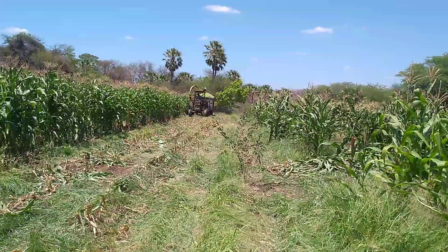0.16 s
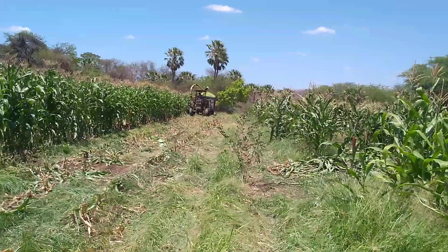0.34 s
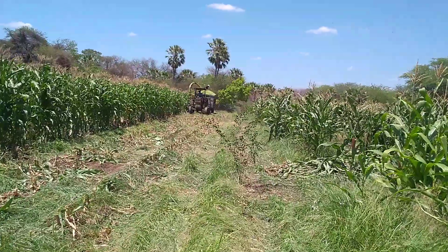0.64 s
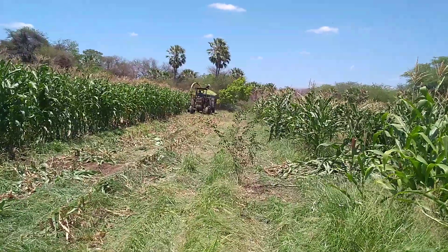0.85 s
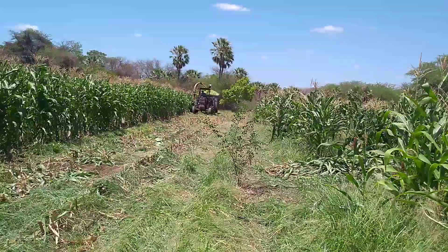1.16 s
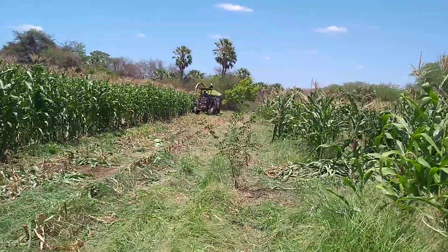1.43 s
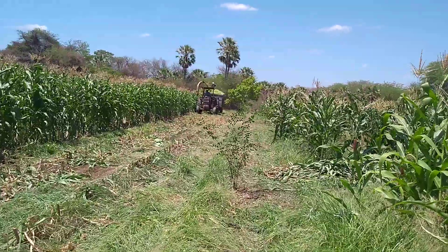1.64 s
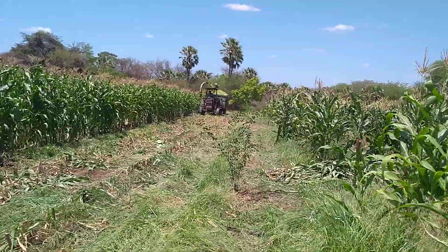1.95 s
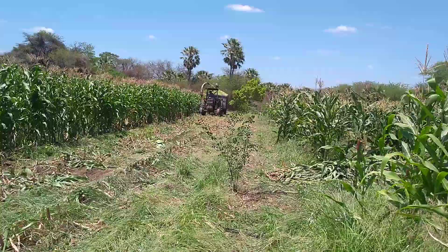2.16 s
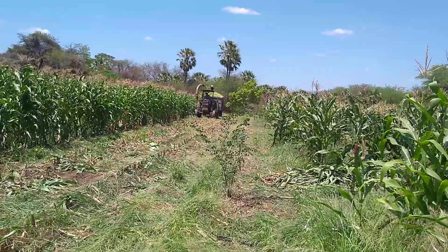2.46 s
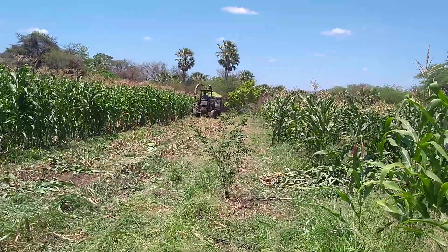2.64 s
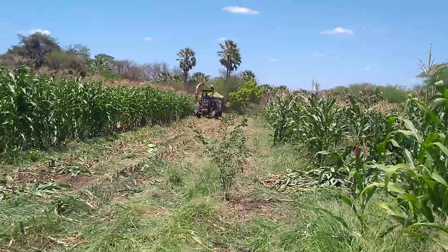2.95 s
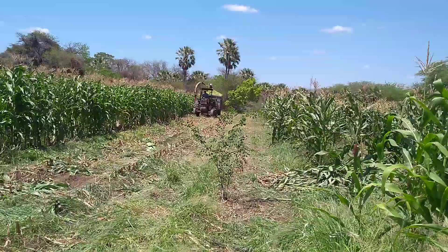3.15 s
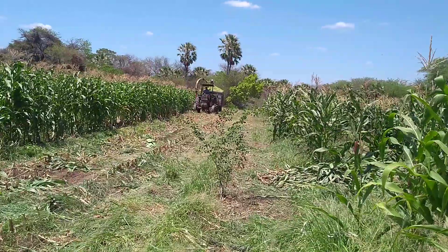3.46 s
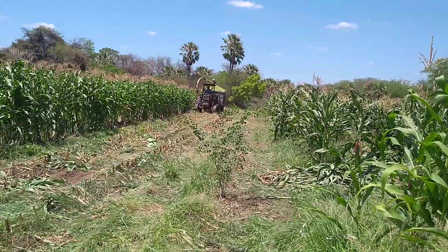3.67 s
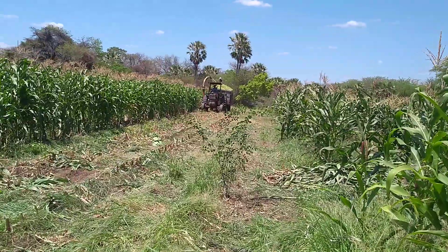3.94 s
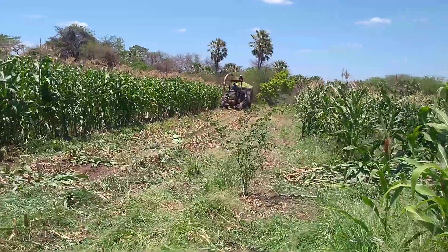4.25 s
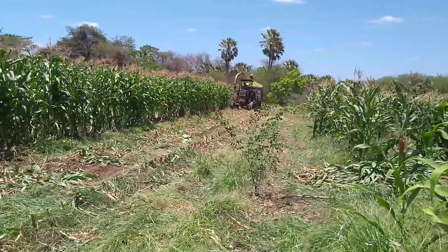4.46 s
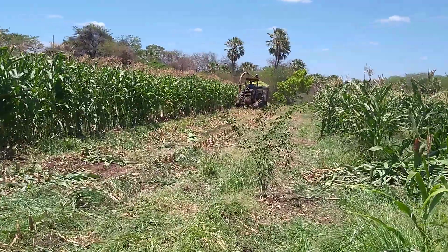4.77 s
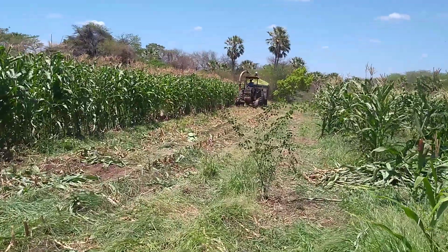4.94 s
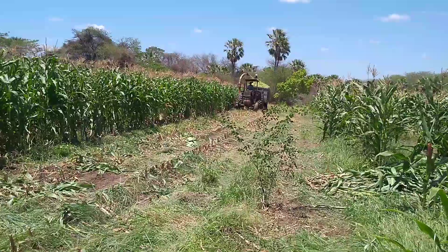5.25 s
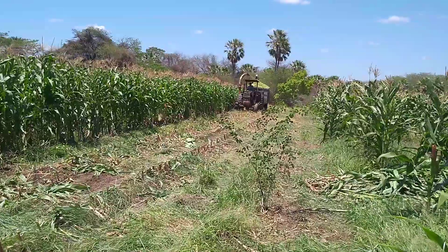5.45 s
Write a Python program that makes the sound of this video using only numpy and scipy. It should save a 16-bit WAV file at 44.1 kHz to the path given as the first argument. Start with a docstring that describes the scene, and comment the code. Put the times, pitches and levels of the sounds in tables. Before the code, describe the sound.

A diesel tractor works straight ahead in an open field, its exhaust throbbing and barking throughout. It pulls a forage harvester whose cutter adds a drone and a fluttering whine, while chopped corn hisses up the spout. At the very start a quick cluster of dull knocks hits the microphone, and the machine sound dips briefly. Light wind buffets the microphone with low puffs during the first second or so. The tractor grows louder until about 3 seconds, with occasional harder exhaust barks. Another small knock comes at about 2.5 seconds. Around 3 seconds the rumble swells for a moment as the cutter takes a thick load. From about 2 seconds on, stalks make faint rattles and clinks against the metal spout. The engine then holds its level, rising slightly in pitch until the end at about 5.6 seconds.

```python
"""A throbbing, barking exhaust: a four-cylinder diesel tractor slowly nears across an open field.
Each firing puffs gas and rings the pipe. It pulls a forage harvester: the cutter drum, geared to the
engine, drones and whines; chopped crop hisses, rattles and clinks up the spout. Ground bounce notches
the noise. Early on, light wind buffets the microphone; a few small knocks reach it."""
import sys
import numpy as np
from scipy import signal
from scipy.fft import rfft, irfft
from scipy.io import wavfile
from scipy.ndimage import uniform_filter1d

SR = 44100
rng = np.random.default_rng(int(sys.argv[2]) if len(sys.argv) > 2 else 0)


def wav_out(sig):
    """Save sig, one row per channel (or a flat mono array), as 16-bit PCM at SR to the path in sys.argv[1]."""
    wavfile.write(sys.argv[1], SR, np.round(np.clip(np.atleast_2d(sig).T, -1, 1) * 32767).astype(np.int16))


N = 246959
TIME_S, BINS_HZ = np.arange(N) / SR, np.fft.rfftfreq(N, 1 / SR)

# engine speed: t/s, firing rate/Hz
FIRING_HZ = [(0, 64.82), (.8, 64.13), (1.3, 66.01), (1.7, 65.53), (2, 64.74), (2.4, 65.46), (2.9, 65.93),
             (3.4, 66.4), (4, 66.43), (4.5, 67.61), (5, 68.63), (5.6, 69.55)]
# cylinder strengths in firing order: level/dB
CYLINDER_DB = [1, -1.3, -1.8, 2.8]
# loudness; the level dips briefly after the opening knock, then grows as the tractor nears: t/s, level/dB
LOUDNESS_DB = [(0.0, -2.5), (0.17, -12), (0.58, -6), (0.75, -6), (0.95, -7), (1.55, -3), (1.98, -2),
               (2.12, -3.5), (2.4, -1), (2.8, -0.7), (2.98, -0.1), (3.15, -1.1), (4.3, -1.06), (5.6, -1)]
# exhaust lines, quarter steps from unequal cylinders: multiple of firing rate, level/dB
EXHAUST_LINES = [(1.75, -8), (2, -1), (2.25, -6), (2.5, -10), (2.75, -25), (3, -4), (3.25, -16.5),
                 (3.75, -10), (4.25, -14), (4.75, -19), (5, -13.5), (5.75, -22), (6, -26)]
# exhaust spectra: f/Hz, level/dB
RUMBLE_DB = [(20, -45), (50, -23), (88, -12), (115, -13), (150, 2), (200, -1.5), (250, 1), (330, -7),
             (440, -8), (600, -14.5), (1000, -37), (2500, -74)]
BARK_DB = [(100, -21), (300, 1.5), (480, 6.5), (650, 5), (800, 5.5), (1050, -4.5), (1350, -2.5),
           (1550, -24), (1900, -16), (2400, -27), (3300, -28), (4300, -19), (7000, -102)]
PIPE_DB = [(300, -40), (650, 6), (850, -1.5), (1300, -5), (1550, -28), (3000, -70)]
# extra-hard firings: t/s, boost/dB
HARD_BARKS = [(0.728, 9), (0.79, 7), (1.07, 6), (2.058, 4), (2.136, 5), (2.259, 2), (2.503, 2.5),
              (3.292, 3), (3.653, 4), (3.713, 1.5), (4.013, 3), (4.55, 4.5), (4.61, 4), (4.759, 3),
              (5.078, 4), (5.255, 3), (5.497, 4.5)]
# ground bounce, moving with the tractor: t/s, first dip/Hz, upper mids/dB, crest/dB
GROUND_BOUNCE = [(0, 636, -2.5, -1.5), (1, 677, -1.5, -1.5), (2, 568, -0.5, 2.5), (2.75, 642, 1.5, 3.5),
                 (3.15, 590, 2, 7), (3.55, 502, 2, 5.5), (4.4, 497, -4.5, 4.5), (5, 560, 0.5, 5),
                 (5.6, 543, 0, 5.5)]
# knife whine: multiple of knife rate, level/dB
WHINE_LINES = [(3, 2.5), (5, -11), (6, -8.5), (7, -5.5)]
# crop spray spectrum: f/Hz, level/dB
SPRAY_DB = [(200, -15), (900, 13.5), (1350, 13.5), (1800, 10.5), (2600, 2.5), (3400, -2.5), (4300, -5.5),
            (5700, -6.5), (7800, -9), (10000, -12), (12500, -13.5), (14500, -15)]
# spout resonances: t/s, lower ring/Hz, lower level/dB, upper level/dB
SPOUT_RINGS = [(0, 3030, -78, -71), (.6, 3150, -82, -75), (1.1, 3050, -74, -73), (1.7, 3270, -68, -72),
               (2.3, 3080, -73, -75), (2.65, 2930, -64, -70), (3.05, 2710, -67, -63),
               (3.25, 3280, -65, -71), (3.9, 3160, -65, -75), (4.25, 3080, -71, -74), (4.7, 3140, -67, -78),
               (4.9, 2920, -77, -63), (5.6, 2750, -73, -74)]
# diffuse treble spectrum: f/Hz, level/dB
TREBLE_DB = [(100, -39), (2000, -45), (2900, -45), (3500, -7), (4500, 10), (6000, 7.5), (8000, 7.5),
             (11000, 1.5), (14000, -3)]
# wind spectrum: f/Hz, level/dB
WIND_DB = [(15, -18), (40, -14), (70, -10), (110, -8), (160, -12.5), (240, -15), (350, -23.5), (600, -59),
           (2000, -80)]
# wind buffets: t/s, level/dB, half length/s
BUFFETS = [(0.175, -31, 0.007), (0.337, -37, 0.028), (.7, -28.5, 0.027), (0.839, -31, 0.007),
           (1.069, -35, 0.015)]
# knocks at the microphone: t/s, level/dB, f/Hz, low-pass/Hz, relative tip level/dB
MIC_KNOCKS = [(.0585, -19, 300, 600, -35), (.0613, -18, 420, 900, -21), (.0675, -15, 130, 350, -45),
              (.0694, -9, 320, 520, -27), (2.409, -29, 900, 2500, -7), (2.4607, -12, 350, 1100, -8)]
# hard stalks hitting the spout: t/s, level/dB, f/Hz
STALK_HITS = [(1.94, -53, 3200), (2.668, -51, 2960), (2.944, -51, 3590), (2.973, -50, 3540),
              (2.98, -52, 2830), (3.045, -53, 2660), (3.652, -54, 3300), (3.828, -50, 3170),
              (4.181, -54, 3020), (4.433, -53, 3150), (4.724, -48, 3130), (5.25, -53, 3470),
              (5.468, -54, 2790), (5.524, -52, 2780)]
# microphone ports, left minus right: f/Hz, level/dB
PORT_BALANCE_DB = [(30, -4.5), (65, -4), (110, -1.2), (200, .1), (370, .5), (680, .4), (1100, 0)]
# microphone ports, out-of-phase part: f/Hz, level/dB
PORT_QUADRATURE_DB = [(30, -4.5), (65, -5.5), (130, -9.2), (250, -15), (450, -19), (750, -29), (1200, -46)]


def amp(db):
    """dB to amplitude."""
    return 10 ** (np.asarray(db) / 20)


def unit_rms(x):
    """Scale to rms 1."""
    return x / np.sqrt(np.mean(x ** 2) + 1e-20)


def curves(rows, t=TIME_S):
    """Table columns, interpolated in time."""
    s, *columns = np.transpose(rows)
    return [np.interp(t, s, c) for c in columns]


def spectrum_db(points, hz=BINS_HZ):
    """Spectrum interpolated in log frequency."""
    f, db = np.transpose(points)
    return np.interp(np.log(hz + 1), np.log(f + 1), db)


def bell(x, width):
    """Gaussian: 1 at zero, 1/e at width."""
    return np.exp(-(x / width) ** 2)


def noise(spectrum):
    """Coloured noise, rms 1."""
    return unit_rms(irfft(rfft(rng.standard_normal(N)) * amp(spectrum_db(spectrum)), N))


def drift(top_hz):
    """Random wander up to top_hz, rms 1."""
    t = np.linspace(0, TIME_S[-1], 1200)
    slow = sum(np.sin(2 * np.pi * (hz * t + rng.random())) for hz in top_hz * np.geomspace(.1, 1, 16))
    return np.interp(TIME_S, t, unit_rms(slow))


def tone(cycles):
    """Cosine, rms 1."""
    return np.sqrt(2) * np.cos(2 * np.pi * cycles)


def partials(cycles, table, waver_cycles, waver_db=1):
    """Lines of a rotation, wavering in level and phase."""
    return sum(amp(db + waver_db * drift(5)) * tone(k * cycles + rng.random() + waver_cycles * drift(5))
               for k, db in table)


def layer_gain(db, follow, db_per_s):
    """A share of the machine's loudness curve plus a slow ramp."""
    return amp(db + follow * curves(LOUDNESS_DB)[0] + db_per_s * (TIME_S - 3))


def close_echo(hz, comb_hz=2250, fade_hz=4800):
    """Comb gain of a short echo at the microphone; long waves bend round the small reflector."""
    comb = abs(1 - np.exp(-2j * np.pi * hz / comb_hz) / (1 + (hz / fade_hz) ** 2))
    return 1 + (comb - 1) * np.minimum(2 * hz / comb_hz, 1)


def across_field(x, spectrum, fading_db, dip_db=8):
    """Source colour, ground-bounce dips, fading in moving air, close echo; rms 1."""
    hz, t, z = signal.stft(x, SR, nperseg=2048, noverlap=1536)
    hz = hz[:, None] + 1
    first_hz, mids_db, crest_db = curves(GROUND_BOUNCE, t)
    second_hz = 2.5 * first_hz
    third_hz = 2 * second_hz - first_hz
    dips = bell(np.log(hz / first_hz), .17) + bell(hz - second_hz, 130) + .5 * bell(hz - third_hz, 130)
    crest = bell(np.log(hz / (1.42 * first_hz)), .36)
    mids = bell(np.log(hz / 1800), .34)
    ground_db = crest_db * crest + mids_db * mids - dip_db * dips
    patches = uniform_filter1d(rng.standard_normal(z.shape), 16, axis=0)
    patches = unit_rms(uniform_filter1d(patches, 14, axis=1))
    z = z * close_echo(hz) * amp(spectrum_db(spectrum, hz) + ground_db + fading_db * patches)
    return unit_rms(signal.istft(z, SR, nperseg=2048, noverlap=1536)[1][:N])


def blowdown(firings, rise_cycles, floor, uneven_db):
    """Gas flow per firing: quick rise, slower fall, strength by cylinder."""
    count = firings.astype(int)
    strength = amp(np.take(CYLINDER_DB, count % 4) + uneven_db * rng.standard_normal(512)[count])
    age = (firings % 1) / rise_cycles
    return floor + strength * age * np.exp(1 - age)


def exhaust(firings):
    """Firing note, overtones and gas puffs that rumble, bark and ring the pipe."""
    note = layer_gain(db=-34.5, follow=1, db_per_s=-.33) * amp(.25 * drift(7.3)) * tone(firings - .13)
    overtones = partials(firings, EXHAUST_LINES, waver_cycles=.052)
    overtones *= layer_gain(db=-36, follow=1, db_per_s=-.8)
    puffs = blowdown(firings, rise_cycles=.13, floor=1, uneven_db=-3.5) * rng.standard_normal(N)
    rumble = across_field(puffs, RUMBLE_DB, fading_db=-.9)
    rumble *= layer_gain(db=-37.5, follow=.52, db_per_s=1.46) * crop_wad(db=6.5)
    hard = amp(sum(db * bell(TIME_S - s, .0047) for s, db in HARD_BARKS))
    bark = layer_gain(db=-44, follow=1.05, db_per_s=-.5) * gas_bark(firings)
    ring = layer_gain(db=-43.8, follow=1.2, db_per_s=.4) * pipe_ring(firings)
    return note + overtones + rumble + hard * (bark + ring)


def gas_bark(firings):
    """Pulsed gas noise: part repeats each engine cycle, part is fresh turbulence."""
    cycle = rng.standard_normal(2600)
    repeating = cycle[(firings / 4 % 1 * len(cycle)).astype(int)]
    flow = blowdown(firings, rise_cycles=.14, floor=.14, uneven_db=.6)
    gas = flow * (.9 * repeating + rng.standard_normal(N))
    bark = across_field(gas, BARK_DB, fading_db=2.96)
    # even barks: each firing's energy follows its flow
    count = firings.astype(int)
    gain = np.sqrt(np.bincount(count, flow ** 2) / (np.bincount(count, bark ** 2) + 1e-9))
    return unit_rms(bark * uniform_filter1d(gain[count], 64))


def pipe_ring(firings, low_hz=700, high_hz=1330):
    """Each firing rings the pipe briefly at a random pitch."""
    hz = low_hz * (high_hz / low_hz) ** rng.random(512)[firings.astype(int)]
    chug = blowdown(firings, rise_cycles=.26, floor=0, uneven_db=.7) ** 1.6
    return across_field(chug * np.sin(2 * np.pi * np.cumsum(hz) / SR), PIPE_DB, fading_db=1)


def cutter_drum(firings, strokes_per_firing=1.8125):
    """Engine-geared knives: growing drone and whine, fading octave."""
    strokes = strokes_per_firing * firings
    drone = layer_gain(db=-38, follow=.88, db_per_s=1.5) * amp(drift(1.9)) * tone(strokes)
    octave = layer_gain(db=-46, follow=1, db_per_s=-3.5) * amp(2 * drift(12)) * tone(2 * strokes)
    whine = partials(strokes, WHINE_LINES, waver_cycles=.015)
    whine *= layer_gain(db=-46.5, follow=1, db_per_s=2)
    bite_flutter = amp(2.2 * drift(28))
    return drone + octave + whine * bite_flutter


def grains(rate_hz, spread_db, cap):
    """Random crop impacts of uneven strength."""
    strength = rng.standard_normal(N) * amp(spread_db * np.minimum(rng.exponential(size=N), cap))
    return strength * (rng.random(N) < rate_hz / SR)


def crop_hiss(firings):
    """Chaff flung up the spout, pulsing slightly with the engine."""
    chaff = unit_rms(grains(rate_hz=2500, spread_db=2.8, cap=4))
    spray = rng.standard_normal(N) + .25 * chaff
    spray *= blowdown(firings, rise_cycles=.35, floor=4.5, uneven_db=2.2)
    hiss = across_field(spray, SPRAY_DB, fading_db=.9)
    return layer_gain(db=-46.5, follow=.76, db_per_s=-.2) * crop_wad(db=1.5) * hiss


def resonate(x, hz, width_hz):
    """Unity-gain resonance; hz may glide."""
    phasor = np.exp(2j * np.pi * np.cumsum(hz * np.ones(N)) / SR)
    pole = np.exp(-np.pi * width_hz / SR)
    return 2 * (phasor * signal.lfilter([1 - pole], [1, -pole], x / phasor + 1e-18)).real


def spout_rattle(upper_hz=3620):
    """Crop rings the sheet metal; the lower ring shifts with where the stream lands."""
    rings = 0
    lower_hz, lower_db, upper_db = curves(SPOUT_RINGS)
    for hz, width_hz, db in (lower_hz, 260, lower_db), (upper_hz, 330, upper_db):
        taps = grains(rate_hz=900, spread_db=4, cap=3)
        rings += amp(db) * unit_rms(resonate(resonate(taps, hz, width_hz), hz, width_hz))
    return rings


def treble_hiss():
    """Faint diffuse hiss, following the machine's level."""
    return layer_gain(db=-71, follow=.7, db_per_s=-.4) * noise(TREBLE_DB)


def wind(breeze_db=-47, db_per_s=-.8):
    """Low, lumpy pressure on the microphone: fading breeze, short buffets."""
    eddies = noise(WIND_DB)
    buffets = sum(amp(db) * np.exp(-((TIME_S - s) / half_s) ** 2 / 2) for s, db, half_s in BUFFETS)
    breeze = amp(breeze_db + 3.7 * drift(2.3) + db_per_s * TIME_S)
    return eddies * (buffets + breeze)


def knocks(decay_cycles=.62, tip_s=.00008, trim_db=-6):
    """Dull pushes dying within a cycle or two, each with a small hard tip."""
    out, t = np.zeros(N), np.arange(2048) / SR
    for s, db, hz, cutoff_hz, tip_db in MIC_KNOCKS:
        push = np.cos(2 * np.pi * hz * t) * np.exp(-t * hz / decay_cycles)
        soft = signal.lfilter(*signal.butter(2, cutoff_hz, fs=SR), push)
        tip = amp(tip_db) * t / tip_s * np.exp(1 - t / tip_s)
        out[round(s * SR):][:len(t)] += amp(db + trim_db) * (soft / abs(soft).max() + tip)
    return irfft(rfft(out) * close_echo(BINS_HZ), N)


def stalk_clinks(decay_s=.0093, rise_s=.002, spread_hz=90):
    """Hard stalks strike the spout; three close modes ring briefly."""
    out, t = np.zeros(N), np.arange(4096) / SR
    envelope = (1 - np.exp(-t / rise_s)) * np.exp(-t / decay_s)
    for s, db, hz in STALK_HITS:
        modes = 0
        for k in -1, 0, 1:
            mode_hz = hz + spread_hz * (k + rng.uniform(-.93, .44))
            modes += np.sin(2 * np.pi * (mode_hz * t + rng.random()))
        slot = out[round(s * SR):][:len(t)]
        slot += (amp(db) * unit_rms(modes) * envelope)[:len(slot)]
    return out


def crop_wad(db, at_s=2.99, half_s=.07):
    """Gain swell as a thick wad loads the drum."""
    return amp(db * bell(TIME_S - at_s, half_s))


def scene():
    """Machine dead ahead; the two ports differ in the bass, so deep notes and wind lean right."""
    firings = .42 + np.cumsum(curves(FIRING_HZ)[0]) / SR
    machine = exhaust(firings) + cutter_drum(firings) + crop_hiss(firings)
    machine += spout_rattle() + stalk_clinks()
    mid = machine + wind() + knocks()
    lean = np.tanh(spectrum_db(PORT_BALANCE_DB) * np.log(10) / 40)
    quadrature = amp(spectrum_db(PORT_QUADRATURE_DB))
    side = irfft(rfft(mid) * (lean + 1j * quadrature), N) + treble_hiss()
    return np.array([mid + side, mid - side])


def record(dry, fade_s=.004, cutoff_hz=14300):
    """Soft ends, then the band limit."""
    ends = np.minimum(np.minimum(TIME_S, TIME_S[-1] - TIME_S) / fade_s, 1)
    lowpass = signal.firwin(701, cutoff_hz, window=("kaiser", 9), fs=SR)
    return signal.oaconvolve(dry * ends, lowpass[None], "same")


dry = scene()
out = record(dry)
wav_out(out)
```